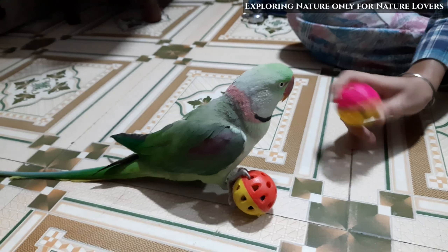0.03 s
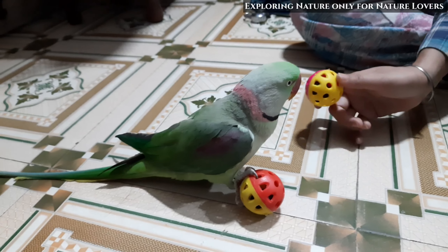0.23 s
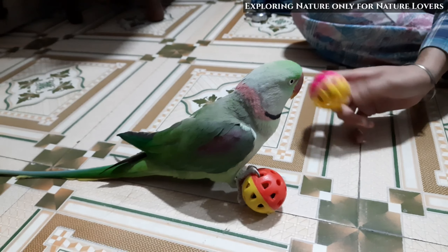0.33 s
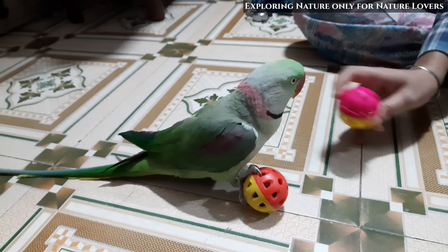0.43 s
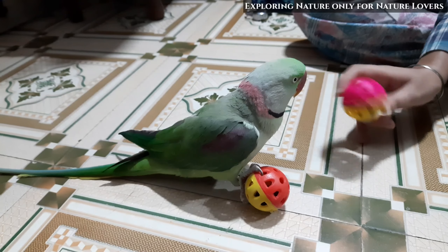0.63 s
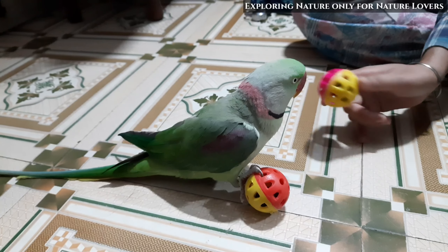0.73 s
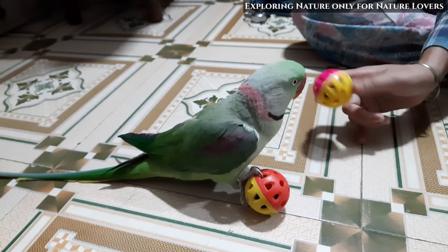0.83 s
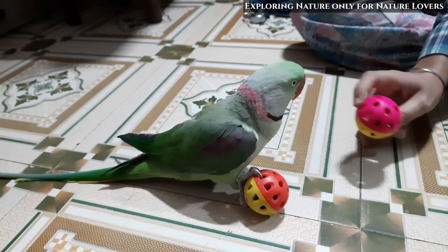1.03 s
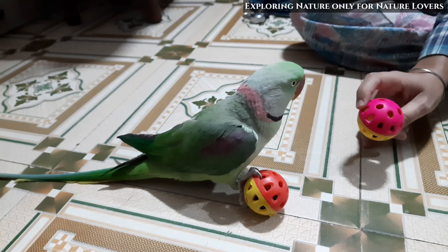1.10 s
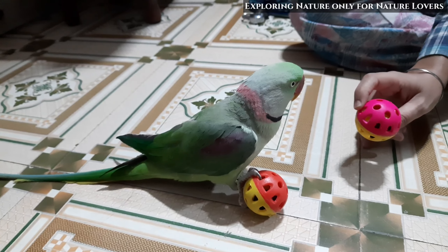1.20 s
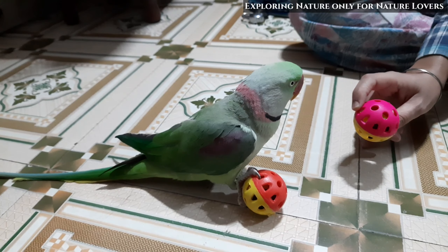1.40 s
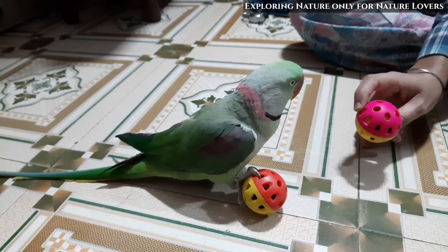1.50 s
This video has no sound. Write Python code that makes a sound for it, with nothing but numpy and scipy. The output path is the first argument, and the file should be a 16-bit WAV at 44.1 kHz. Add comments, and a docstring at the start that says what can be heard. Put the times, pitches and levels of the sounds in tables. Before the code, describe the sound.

A small bell rattles inside a hollow plastic ball shaken close to the microphone. The bright metallic clatter, mixed with light plastic knocks, starts at about 0.2 seconds, surges again near 0.5 and 0.8 seconds, and keeps tumbling until it dies away around 1.4 seconds. The room adds a slight echo, and a faint low rumble and hum lie underneath throughout.

```python
"""A hand shakes a plastic lattice ball close to the microphone, in a tiled room.
The small sheet-metal bell inside tumbles: its pellet strikes it in quick bursts of contacts, and the bell knocks on the hollow shell.
Fainter chatter fills the gaps between the knocks. Behind it are a low room rumble and a faint drone, like a far engine."""
import sys
import numpy as np
from scipy import signal
from scipy.fft import rfft, irfft, next_fast_len
from scipy.io import wavfile

SR = 44100
rng = np.random.default_rng(int(sys.argv[2]) if len(sys.argv) > 2 else 0)


def dump_mix(stems):
    """Bounce the given channels to the path in sys.argv[1] as a 16-bit WAV at rate SR."""
    frames = np.atleast_2d(stems).T  # one column per channel
    limited = np.clip(frames, -1, 1)  # hard clip at full scale
    pcm = np.round(limited * 32767).astype(np.int16)
    wavfile.write(sys.argv[1], SR, pcm)


N = 68355

# (s, bell level dB, shell level dB, plastic crack level dB, extra treble of the bell dB, contact length s)
KNOCKS = [(0.1209, -56.0, -59.5, -66.0, -16, 0.0025), (0.2264, -36.0, -44.5, -44.0, 1, 0.0025),
          (0.2295, -31.5, -40.5, -36.0, 1, 0.0039), (0.2444, -14.5, -31.0, -29.0, -5, 0.0095),
          (0.2693, -24.5, -42.0, -44.5, -4, 0.0035), (0.2749, -23.5, -37.5, -42.5, -5, 0.0025),
          (0.2812, -22.0, -38.5, -38.5, -5, 0.0028), (0.2966, -20.0, -40.5, -39.0, -9, 0.0051),
          (0.3222, -23.0, -41.0, -46.0, -7, 0.0021), (0.3408, -28.0, -42.0, -42.5, -2, 0.0021),
          (0.3756, -23.5, -47.5, -43.5, -5, 0.0017), (0.387, -29.0, -48.5, -45.0, -4, 0.0015),
          (0.3975, -30.5, -46.0, -44.0, -3, 0.002), (0.4211, -27.0, -51.5, -38.5, 0, 0.0015),
          (0.4489, -35.0, -55.5, -48.5, -7, 0.0025), (0.4754, -39.5, -53.5, -54.0, 0, 0.0015),
          (0.4879, -27.5, -41.0, -30.0, 2, 0.0021), (0.507, -32.5, -34.5, -39.5, -2, 0.0016),
          (0.5119, -26.5, -39.5, -28.5, -3, 0.0018), (0.5141, -15.0, -36.0, -30.0, 2, 0.0029),
          (0.5235, -26.0, -28.5, -40.0, 7, 0.0017), (0.529, -30.0, -42.5, -38.5, 0, 0.0046),
          (0.5525, -25.0, -34.0, -41.5, 5, 0.0022), (0.5621, -22.5, -38.5, -32.5, -1, 0.0029),
          (0.5708, -17.5, -45.0, -34.0, 0, 0.0025), (0.5932, -25.0, -46.5, -43.5, 3, 0.0023),
          (0.6215, -29.5, -46.5, -44.5, 3, 0.0019), (0.636, -28.5, -53.0, -48.0, 6, 0.0015),
          (0.7149, -22.5, -41.5, -43.5, -3, 0.0022), (0.7219, -26.0, -43.0, -47.0, 4, 0.0024),
          (0.733, -26.0, -43.5, -43.0, 0, 0.0026), (0.7397, -21.5, -44.5, -38.5, 0, 0.0022),
          (0.7476, -33.5, -50.0, -48.5, 0, 0.0024), (0.7551, -28.5, -41.0, -50.0, -3, 0.0033),
          (0.7764, -34.0, -52.5, -54.5, -3, 0.0035), (0.8194, -26.5, -37.5, -39.5, 6, 0.002),
          (0.8234, -27.5, -37.5, -36.0, 5, 0.0015), (0.832, -19.0, -31.5, -33.0, 6, 0.0033),
          (0.841, -15.0, -32.0, -30.0, 4, 0.0015), (0.8548, -27.0, -44.5, -41.5, 3, 0.0021),
          (0.8731, -23.0, -50.5, -37.5, 3, 0.0022), (0.8804, -23.5, -42.5, -38.5, 5, 0.003),
          (0.8842, -14.5, -37.0, -32.0, 0, 0.0039), (0.8985, -27.0, -54.5, -47.0, -1, 0.0082),
          (0.9109, -30.0, -52.0, -44.5, 1, 0.0015), (0.9218, -23.0, -51.0, -45.5, 2, 0.0031),
          (0.9589, -29.0, -47.5, -49.0, 0, 0.0025), (0.963, -24.5, -44.5, -42.0, 1, 0.0016),
          (0.9716, -24.5, -46.5, -43.0, -1, 0.0032), (0.9776, -27.0, -51.5, -46.0, -6, 0.0025),
          (0.986, -29.0, -40.0, -44.0, -5, 0.0021), (0.9933, -21.5, -37.5, -32.0, -2, 0.0017),
          (1.0015, -25.0, -46.0, -37.0, 4, 0.0015), (1.0136, -31.0, -41.0, -41.5, 4, 0.0057),
          (1.0334, -25.0, -36.0, -35.0, 4, 0.0026), (1.044, -25.5, -32.0, -37.5, 3, 0.0059),
          (1.0558, -30.5, -34.5, -38.5, 1, 0.0045), (1.0687, -25.0, -36.5, -38.0, 2, 0.0032),
          (1.075, -27.5, -42.0, -41.5, -1, 0.0025), (1.0846, -27.5, -41.5, -42.0, 4, 0.0027),
          (1.0976, -20.5, -33.0, -35.5, 1, 0.0041), (1.1186, -25.5, -37.5, -42.5, -5, 0.0033),
          (1.1328, -22.5, -38.0, -38.0, -1, 0.0042), (1.1442, -29.0, -45.0, -42.5, 0, 0.002),
          (1.167, -28.0, -43.5, -42.5, -4, 0.002), (1.1844, -30.5, -53.5, -48.5, -1, 0.0029),
          (1.2784, -37.5, -42.0, -46.0, -1, 0.0045), (1.2832, -31.5, -39.0, -43.0, -4, 0.003),
          (1.2965, -27.0, -44.0, -44.5, -4, 0.0024), (1.3056, -29.5, -37.0, -40.5, -3, 0.002),
          (1.3403, -28.0, -46.5, -45.0, -7, 0.0028), (1.4709, -50.5, -70.0, -57.5, -4, 0.0025)]  # fixed
# (s, level dB of the fine chatter of the tumbling bell)
CHATTER = [(.222, -75), (.25, -31.5), (.34, -29.5), (.37, -41), (.47, -56), (.52, -30), (.6, -29.5), (.69, -40.5), (.76, -37), (.81, -47.5), (.84, -33.5), (.95, -36.5), (1.06, -28.5), (1.15, -30.5), (1.22, -49), (1.25, -44.5), (1.29, -35), (1.37, -63)]
CHATTER_PER_S, CHATTER_SPREAD_DB, CHATTER_BELL_DB, CHATTER_SHELL_DB = 700, 3, -8, -13
# the bell: (Hz, dB, t60 s)
BELL = [(5540, -7, 0.012), (5790, -9, 0.068), (7060, -5.5, 0.015), (7080, -15, 0.026), (7616, -0.5, 0.016), (7720, 1, 0.025), (7670, -17, 0.01636), (9237, -2.5, 0.012), (9953, -5, 0.011), (11037, -5, 0.014), (12020, -7.5, 0.0087), (12600, -16, 0.022), (14430, -11.5, .022), (14700, -17, .012)]
# the plastic shell and the air in it: (Hz, dB, t60 s)
SHELL = [(856, -13.5, 0.013), (1180, -7.5, 0.012), (1341, -1, 0.03), (1421, -2.5, 0.028), (2005, -3.5, 0.0063), (2705, -12, 0.045), (3347, -10, 0.027)]
# the dry metallic click of a contact: (Hz, dB per Hz)
CLICK = [(100, -23), (1000, -20.5), (3300, -18.5), (4300, -14.5), (5800, 1.5), (8400, -2.5), (10400, -12), (12000, -8), (12900, -11), (15000, -5), (15900, -47)]
BELL_DB, CLICK_DB, SHELL_DB, KNOCK_DB = -1, -8.5, -0.5, -.5
CONTACTS_PER_S, CONTACT_SPREAD_DB, RELEASE_S, RING_S = 7000, 1.5, .0006, 0.0021
LEFT_LAG_S, PORT_ALIKE, BALANCE_DB = 0.0001, 0.44, 0
# (Hz, t60 s)
ROOM = [(200, 0.51), (1400, 0.37), (4000, 0.48), (8000, 0.26), (15000, .36)]
ROOM_DB, WALLS_DB, WALLS_S = -6, -8.5, .024
# (Hz, dB per Hz)
RUMBLE = [(20, -14), (45, -36), (65, -6.5), (120, -3), (240, 1.5), (400, -8), (700, -14), (1500, -23.5), (3000, -31.5), (4500, -39.5), (6500, -29.5), (10000, -49), (15000, -49)]
RUMBLE_DB = -52
# (Hz, left-right likeness)
RUMBLE_ALIKE = [(60, 0.36), (150, 1), (600, .55), (2000, .1)]
# the drone: (s, pitch Hz, level dB of the fundamental, level dB of its octave)
DRONE = [(0, 58.5, -77, -56.5), (.17, 59.2, -66, -58), (.35, 63.26, -62.5, -64.5), (.65, 65.4, -63, -58.5), (.9, 69.27, -55.5, -63.5), (1.12, 71.4, -59.5, -53), (1.35, 72.5, -67.5, -56), (1.55, 74.9, -67, -62)]
TOP_HZ = 15700  # fixed
# the crack of the plastic: (Hz, dB per Hz)
CRACK = [(60, -14), (250, -10), (500, -14), (1000, -2.5), (2200, -8.5), (3300, 9), (4200, -1.5), (5500, 6), (9000, -8.5), (16000, -8)]
TREBLE_FROM_HZ, ATTACK_S = 8600, 0.00032
CRACK_DB, CHATTER_CRACK_DB = 1, -17
# a faint thin tone, heard as the rattle dies: its pitch, and (s, level dB)
THIN_TONE_HZ = 3070
THIN_TONE = [(1.3, -85), (1.4, -62), (1.55, -65)]
DETUNE = 0.0035  # share by which a mode's pitch differs from knock to knock
ROOM_STEP_S = .12  # fixed
# the fingers cover more or fewer holes and so tune the shell: (s, pitch factor)
GRIP = [(.24, 0.86), (.45, 1.04), (.51, .975), (.73, 1.04), (.84, .96), (1.05, .99), (1.33, 1.105)]
THIN_TONE_WIDTH_HZ = 30


def amp(db):
    """Decibels to gain."""
    return 10 ** (np.asarray(db) / 20)


def unit(x):
    """x at rms 1."""
    return x / np.sqrt(np.mean(x ** 2) + 1e-20)


def along(points, hz):
    """(Hz, value) points on a log axis."""
    f, v = np.transpose(points)
    return np.interp(np.log(hz + 1), np.log(f + 1), v)


def curves(rows):
    """One value per sample for each column after the time."""
    s, *cols = np.transpose(rows)
    return [np.interp(np.arange(N) / SR, s, c) for c in cols]


def filtered(x, response):
    """x times a complex response of frequency."""
    m = next_fast_len(N + SR // 2)
    return irfft(rfft(x, m) * response(np.fft.rfftfreq(m, 1 / SR)), m)[..., :N]


def ring(modes, size=3072):
    """A body's answer to one contact, with energy 1."""
    t = np.arange(size) / SR
    x = sum(amp(db - 60 * t / t60) / np.sqrt(t60) * np.sin(2 * np.pi * (hz * (1 + DETUNE * rng.standard_normal()) * t + rng.random()))
            for hz, db, t60 in modes)
    x = x * (1 - np.exp(-t * modes[0][0] * 2))
    return x / np.linalg.norm(x)


def click(spectrum, treble_db=0, size=3072):
    """The causal click of one contact, with energy 1."""
    hz = np.fft.rfftfreq(size, 1 / SR)
    cepstrum = irfft(np.log(amp(along(spectrum, hz) + treble_db * (hz > TREBLE_FROM_HZ))))
    cepstrum[1:size // 2] *= 2
    cepstrum[size // 2 + 1:] = 0
    x = irfft(np.exp(rfft(cepstrum)))
    return x / np.linalg.norm(x)


def contacts(per_s, spread_db, size):
    """Random tiny impacts, heard partly differently by the two microphones."""
    strength = (rng.random(size) < per_s / SR) * amp(spread_db * np.clip(rng.standard_normal(size), -2, 2))
    alike = np.clip(PORT_ALIKE, 0, 1)
    signs = rng.choice([-1, 1], size)
    return strength * (np.sqrt(alike) * signs + np.sqrt(1 - alike) * rng.standard_normal((2, size)))


def excite(force, body):
    """The body driven by a stereo force, with energy 1 per channel."""
    x = signal.fftconvolve(force, body[None], axes=1)
    return x / np.sqrt(np.sum(x ** 2, axis=1, keepdims=True) + 1e-20)


def knocks(size=1024):
    """Each knock is a short burst of contacts that rings bell and shell; the spot that is struck sets its brightness."""
    out, t, crack = np.zeros((2, N + SR)), np.arange(size) / SR, click(CRACK)
    for s, bell_db, shell_db, crack_db, treble_db, length in KNOCKS:
        press = (1 - np.exp(-t / ATTACK_S)) * np.exp(-np.maximum(t - length, 0) / RELEASE_S)
        force = contacts(CONTACTS_PER_S, CONTACT_SPREAD_DB, size) * press
        bell = ring([(hz, db + treble_db * (hz > TREBLE_FROM_HZ), t60) for hz, db, t60 in BELL])
        metal = amp(BELL_DB) * excite(force, bell) + amp(CLICK_DB) * excite(force, click(CLICK, treble_db))
        shell = ring([(hz * np.interp(s, *np.transpose(GRIP)), db, t60) for hz, db, t60 in SHELL])
        plastic = amp(shell_db + SHELL_DB) * excite(force, shell) + amp(crack_db + CRACK_DB) * excite(force, crack)
        sound = (amp(bell_db) * metal + plastic) * np.sqrt((abs(length) + RING_S) * SR)
        start = max(round(s * SR), 0)
        out[:, start:start + sound.shape[1]] += sound
    return amp(KNOCK_DB) * out[:, :N]


def chatter():
    """Light, dense contacts while the bell rolls and settles."""
    level_db, = curves(CHATTER)
    force = unit(contacts(CHATTER_PER_S, CHATTER_SPREAD_DB, N)) * amp(level_db)
    metal = amp(CHATTER_BELL_DB) * (amp(BELL_DB) * ring(BELL) + amp(CLICK_DB) * click(CLICK))
    plastic = amp(CHATTER_SHELL_DB) * ring(SHELL) + amp(CHATTER_CRACK_DB) * click(CRACK)
    return signal.fftconvolve(force, (metal + plastic)[None], axes=1)[:, :N]


def room(x):
    """The ball keeps moving, so the room answers each short stretch differently."""
    out, step = np.zeros((2, N + SR)), round(ROOM_STEP_S * SR)
    for start in range(0, N, step):
        wet = signal.fftconvolve(x[:, start:start + step], echoes(), axes=1)
        out[:, start:start + wet.shape[1]] += wet
    return out[:, :N]


def background():
    """Low room rumble and a faint drone that slowly rises in pitch."""
    turn = lambda hz: np.arccos(np.clip(along(RUMBLE_ALIKE, hz), -1, 1)) / 2
    mid, side = filtered(rng.standard_normal((2, N)), lambda hz: amp(along(RUMBLE, hz)) * [np.cos(turn(hz)), np.sin(turn(hz))])
    pitch_hz, low_db, octave_db = curves(DRONE)
    phase = 2 * np.pi * np.cumsum(pitch_hz) / SR
    drone = np.sqrt(2) * (amp(low_db) * np.sin(phase) + amp(octave_db) * np.sin(2 * phase))
    return (amp(RUMBLE_DB) * unit(np.array([mid + side, mid - side])) + drone) * amp([[-1], [1]])


def thin_tone():
    """A faint, wavering high tone behind the last rattles."""
    level_db, = curves(THIN_TONE)
    band = lambda hz: np.exp(-((hz - THIN_TONE_HZ) / THIN_TONE_WIDTH_HZ) ** 2)
    return amp(level_db) * unit(filtered(rng.standard_normal((2, N)), band))


def echoes(count=10):
    """Early echoes from floor and walls, then a tail whose treble dies first."""
    hz, t, z = signal.stft(rng.standard_normal((2, SR // 2)), SR, nperseg=256)
    tail = signal.istft(z * amp(-60 * t / along(ROOM, hz)[:, None]), SR, nperseg=256)[1]
    tail *= amp(ROOM_DB) / np.linalg.norm(tail[0])
    for side in tail:
        side[(rng.uniform(.05, 1, count) * WALLS_S * SR).astype(int)] += amp(WALLS_DB) / np.sqrt(count)
    return tail


def scene():
    """The ball, a little to the right, with its room and the background."""
    ball = filtered(knocks() + chatter(), lambda hz: np.exp(1j * np.pi * hz * LEFT_LAG_S * np.array([[-1], [1]])))
    return (ball + room(ball)) * amp([[BALANCE_DB], [-BALANCE_DB]]) + background() + thin_tone()


def record(dry):
    """The recorder keeps nothing above its band limit."""
    return filtered(dry, lambda hz: hz < TOP_HZ)


dry = scene()
out = record(dry)
dump_mix(out)
```